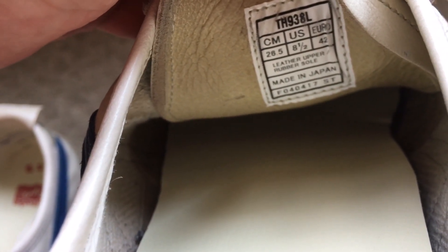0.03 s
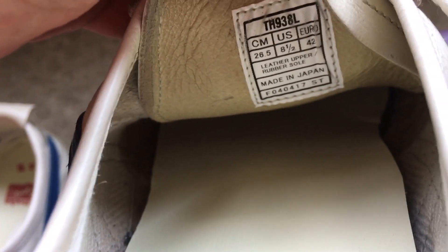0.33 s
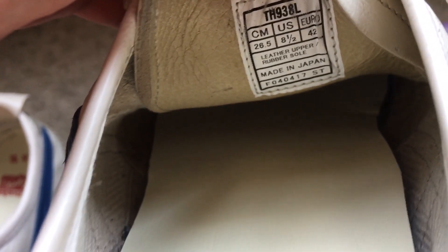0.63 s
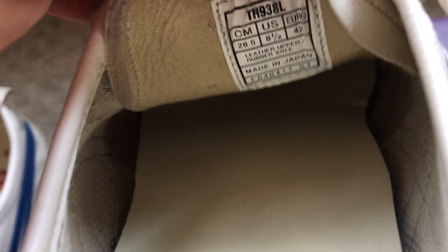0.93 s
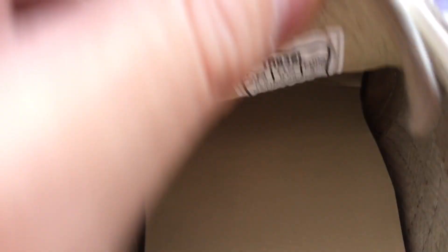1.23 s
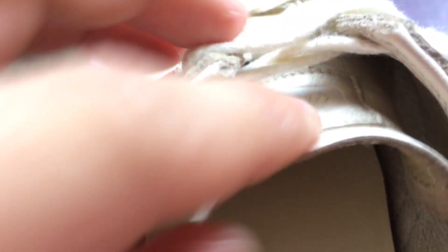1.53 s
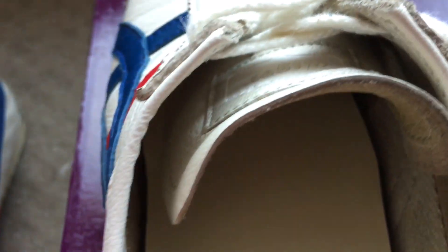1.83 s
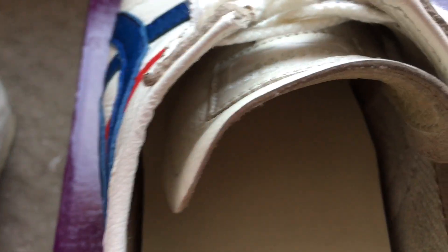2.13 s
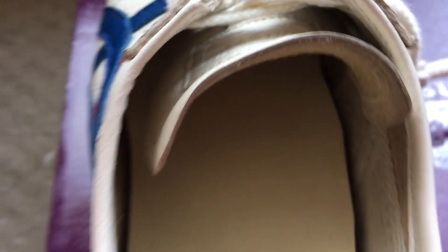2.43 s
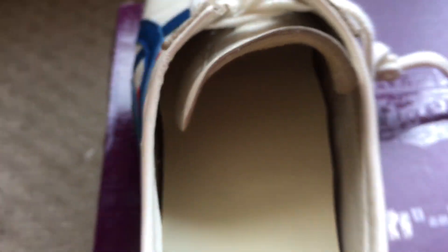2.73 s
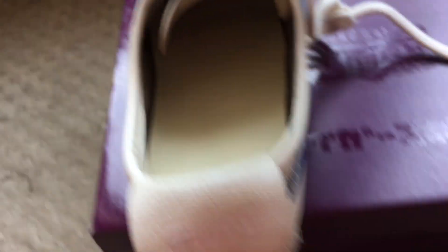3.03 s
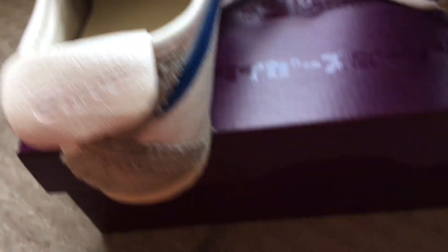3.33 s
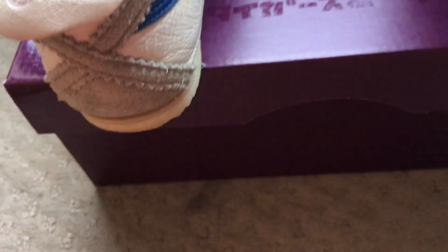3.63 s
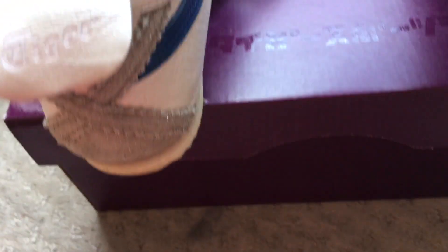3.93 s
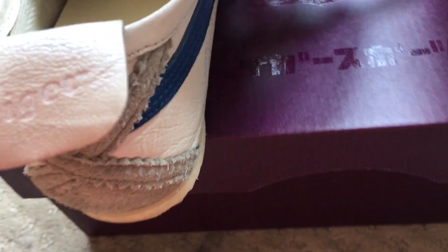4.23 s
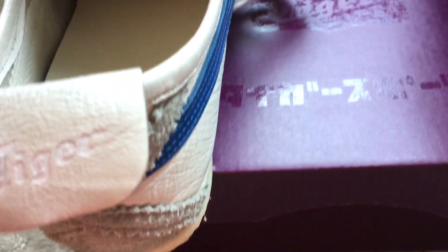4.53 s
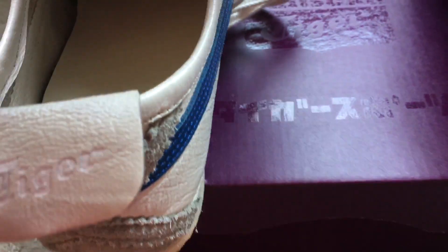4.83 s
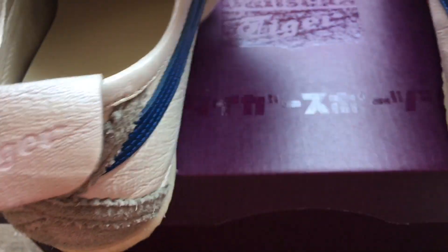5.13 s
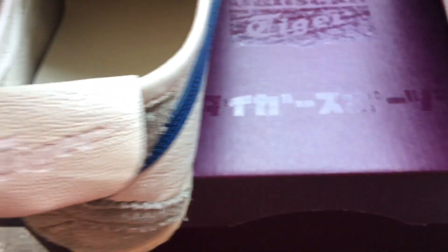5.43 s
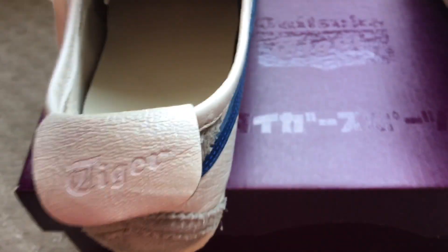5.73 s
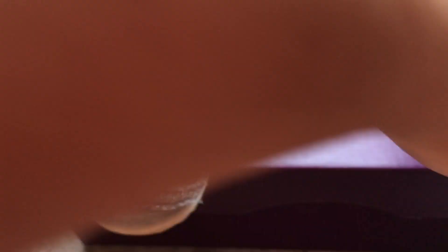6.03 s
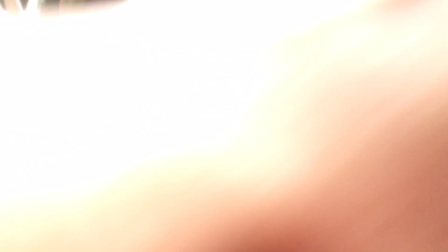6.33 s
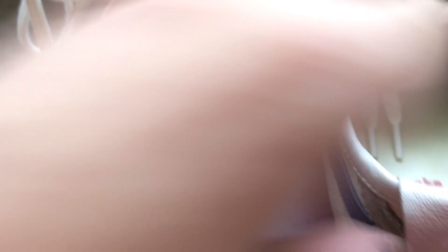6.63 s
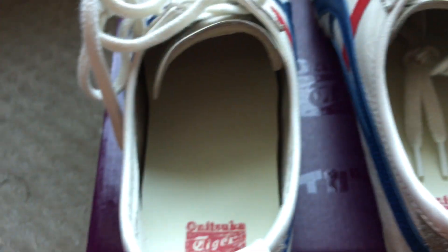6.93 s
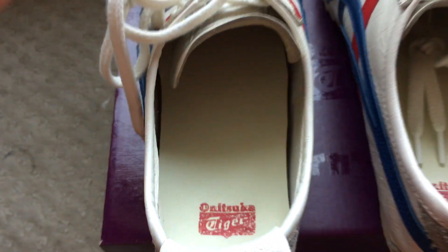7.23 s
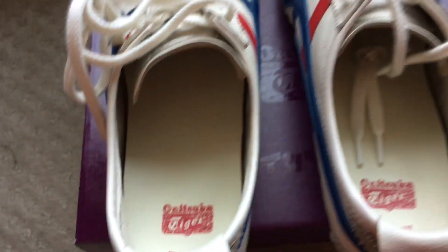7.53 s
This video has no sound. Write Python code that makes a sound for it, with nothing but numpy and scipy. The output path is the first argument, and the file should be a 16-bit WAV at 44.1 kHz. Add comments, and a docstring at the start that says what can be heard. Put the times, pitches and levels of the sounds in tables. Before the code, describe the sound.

Hands handle a leather sneaker on a cardboard shoebox, close to the microphone in a quiet room. Soft bumps and clicks give way to faint rubbing of skin on leather. Midway the sole knocks hollowly on the box and hard lace tips snap against the lid. A brief rasp and another knock follow, then more scuffing and a last clear bump, all over a faint low hum.

```python
"""Sneaker on a shoebox

Hands turn a leather sneaker over on a cardboard shoebox, close-miked in a quiet carpeted room.
The sole bumps the hollow box and catches on the lid, hard lace tips tap the card, skin and leather
rub and scuff, and the shifting grip rumbles softly over a low room hum."""
import sys
import numpy as np
from scipy import signal
from scipy.fft import rfft, irfft, next_fast_len
from scipy.io import wavfile

SR = 44100
rng = np.random.default_rng(int(sys.argv[2]) if len(sys.argv) > 2 else 0)


def file_out(sig):
    """Save sig as 16-bit WAV at sys.argv[1]."""
    # one column per channel
    cols = np.atleast_2d(sig).T
    # limit, then scale
    lim = np.clip(cols, -1, 1)
    pcm = np.round(lim * 32767).astype(np.int16)
    wavfile.write(sys.argv[1], SR, pcm)


N = 339173


def from_db(db):
    return 10 ** (np.asarray(db) / 20)


def rms_one(x):
    return x / np.sqrt(np.mean(x ** 2) + 1e-20)


def peak_one(x):
    return x / (np.abs(x).max() + 1e-20)


def add(track, s, sound):
    """Lay a short sound into the track at s seconds."""
    at = max(0, round(s * SR))
    track[at:at + len(sound)] += sound[:max(0, N - at)]


def colour(x, spectrum):
    """EQ a steady sound to a curve, rolling off steeply past its ends; rms 1."""
    size = next_fast_len(N)
    hz = np.maximum(np.arange(size // 2 + 1) * SR / size, 1)
    points, db = np.transpose(spectrum)
    curve = from_db(np.interp(np.log(hz), np.log(points), db))
    rolloff = 1 / np.sqrt((1 + (points[0] / hz) ** 8) * (1 + (hz / points[-1]) ** 8))
    return rms_one(irfft(rfft(x, size) * rolloff * curve, size)[:N])


def drift(rate):
    """Random modulation, gliding to a new value `rate` times a second."""
    knots = rng.standard_normal(N // 20)
    return np.interp(np.arange(N) / SR * rate, np.arange(len(knots)), knots)


def ring(x, hz, t60):
    """One resonant mode: a unit click rings a decaying sine of height 1."""
    r, w = from_db(-60 / (t60 * SR)), 2 * np.pi * hz / SR
    return signal.lfilter([0, np.sin(w)], [1, -2 * r * np.cos(w), r * r], x + 1e-18)


def band(x, hz, octaves):
    """A gentle band-pass reaching so many octaves to each side."""
    edges = [hz / 2 ** octaves, min(hz * 2 ** octaves, .45 * SR)]
    return signal.sosfilt(signal.butter(1, edges, "band", fs=SR, output="sos"), x + 1e-18)


def push(t, hz, swell):
    """A soft contact swells for `swell` cycles (at least 0.4) and dies away; peak 1."""
    age = t * hz / max(swell, .4)
    return peak_one(np.sin(2 * np.pi * hz * t) * age * np.exp(-age))


def among_fingers(x, strength=0.24, count=7):
    """Comb colour from unevenly spaced reflections off the hand and the shoe."""
    lags = (rng.uniform(.0002, .003, count) * SR).astype(int)
    signs = rng.choice([-1, 1], count)
    return x + sum(sign * strength * np.pad(x, (lag, 0))[:len(x)] for lag, sign in zip(lags, signs))


def crack(t60, snap):
    """A first snap, then a dying burst of tiny fractures."""
    t = np.arange(SR // 10) / SR
    return np.r_[snap, rng.standard_normal(len(t) - 1)] * from_db(-60 * t / t60)


def tick(hz, octaves, t60):
    """Leather damps a tick at once, leaving only a broad colour; peak 1."""
    burst = among_fingers(crack(t60, snap=1))
    return peak_one(band(band(burst, hz, octaves), hz, 2 * octaves))


def stroke(times, attack_s=0.022, release_s=0.093, light_db=-8):
    """Hand pressure: takes hold at the earliest of three times, peaks at 1, lets go at the latest."""
    start, hardest, end = sorted(times)
    knots = [start - attack_s, start, hardest, end, end + release_s]
    light = from_db(light_db)
    return np.interp(np.arange(N) / SR, knots, [0, light, 1, light, 0])


def lid(x, modes, direct_db):
    """Card rings in broad resonances, at least 65 Hz wide, over some of the direct contact."""
    out = from_db(direct_db) * x
    for hz, width, db in modes:
        r = np.exp(-np.pi * max(width, 65) / SR)
        gain = (1 - r * r) / 2
        poles = [1, -2 * r * np.cos(2 * np.pi * hz / SR), r * r]
        out = out + from_db(db) * signal.lfilter([gain, 0, -gain], poles, x + 1e-18)
    return out


# EQ curve of the room tone: f/Hz, level/dB
ROOM_TONE_EQ = [(21, -42), (36, -4), (54, -4), (70, -14), (139, -18.5), (194, -27), (263, -21.5),
                (292, -30.5), (396, -31.5), (730, -39.5), (2300, -44.5), (3380, -47), (16000, -54.5)]
# partials of the low hum: f/Hz, rms level/dB
HUM_PARTIALS = [(45.7, -65), (68, -64.5)]


def room_bed(tone_db=-56.8, waver_db=2.5, waver_radians=0.64):
    """Dark room tone with a low hum that wavers in level and phase."""
    t = np.arange(N) / SR
    hum = np.zeros(N)
    for hz, db in HUM_PARTIALS:
        level = from_db(db + waver_db * drift(2.1))
        hum += level * rms_one(np.sin(2 * np.pi * hz * t + waver_radians * drift(3.3)))
    return from_db(tone_db) * colour(rng.standard_normal(N), ROOM_TONE_EQ) + hum


# modes of the box's air space and panels: f/Hz, level/dB, t60/s
BOX_MODES = [(121.8, -29.5, 0.094), (168.8, 6, 0.096), (216, 0, 0.11), (241, 3.5, 0.027), (346.5, 3, 0.063),
             (400, -29.5, 0.16), (561, 0.5, 0.03), (688, -6, 0.025), (1080, 5.5, 0.066)]
# sole hits on the box: t/s, peak level/dB, contact f/Hz, swell/cycles,
# then the relative layer levels: boom/dB, slap/dB, settle/dB
SOLE_BUMPS = [(0.267, -38, 377, 0.44, -13, -9, -10), (0.669, -43.5, 397, .33, -11, -2.5, -15),
              (1.201, -28.5, 445, 0.58, -2, -11.5, -17), (1.235, -32.5, 444, 0.36, -6, -18, -26),
              (1.407, -19, 432, 0.54, 0, -15.5, -19), (1.588, -40, 434, 0.96, 0, -13.5, -12),
              (1.694, -39, 467, 1.15, 3, -29, -1), (2.176, -49, 210, 0.62, 9, -13, -15),
              (3.533, -21, 296, 0.44, 3, -14, -10.5), (3.809, -17.5, 317, 0.3, -1, -10, -24),
              (4.14, -39.5, 199, 0.39, -5, -28, -9), (4.179, -26.5, 400, .33, 0, -4.5, -10.5),
              (4.242, -35.5, 450, 0.56, 3, -20, -11), (4.268, -30.5, 272, .33, -5, -30, -24),
              (4.302, -29, 463, 0.57, -6, -7, -7), (4.378, -48, 166, 0.67, -7, -30, -29),
              (4.612, -41, 433, .33, 0.5, -33, -6), (5.092, -42, 188, 0.52, 21, -18, -3.5),
              (5.338, -20.5, 623, 0.65, 0.5, -18, -5), (5.386, -38.5, 603, 0.83, 13, -31, 0),
              (5.582, -41.5, 577, 0.64, -10, -31, -38), (5.784, -31.5, 524, 0.49, -12, -13, -11),
              (6.136, -40.5, 209, 0.77, -3, -13, -19), (6.17, -36, 153, 0.38, -7, -33, -23),
              (6.213, -40, 262, 0.35, 15, -22, -22), (6.314, -28, 280, .3, -6.5, -15, -14),
              (6.573, -21, 300, 0.6, -6, -19.5, -22), (7.486, -50, 200, .35, -8, -20, -18),
              (7.62, -45, 191, .34, -21, -24, -22)]


def bumps(flutter_db=-17, flutter_t60=0.072, flutter_hz=330, thud_db=-17, thud_hz=76):
    """The sole slaps, pushes and settles; box booms, lid flutters; a low thud comes with each bump."""
    out, t = np.zeros(N), np.arange(SR // 3) / SR
    for s, db, hz, swell, boom_db, slap_db, settle_db in SOLE_BUMPS:
        contact = push(t, hz, swell)
        spot_db = rng.normal(0, 2.5, len(BOX_MODES))   # each spot on the box favours other modes
        boom = sum(from_db(mode_db + trim_db) * ring(contact, mode_hz, t60)
                   for (mode_hz, mode_db, t60), trim_db in zip(BOX_MODES, spot_db))
        flutter = band(band(rng.standard_normal(len(t)), flutter_hz, 1.47), flutter_hz, 1.47)
        flutter *= from_db(-60 * t / flutter_t60)
        thud = from_db(thud_db) * push(t, thud_hz, swell=1.3)
        body = from_db(boom_db) * peak_one(boom) + from_db(flutter_db) * peak_one(flutter) + thud
        add(out, s, from_db(db) * peak_one(contact + body))
        # the leather slap leads the hit; the shoe settles just after it
        add(out, s - .002, from_db(db + slap_db) * tick(hz=1130, octaves=0.84, t60=0.023))
        add(out, s + .019, from_db(db + settle_db) * push(t, hz=180, swell=0.37))
    return out


# nail ticks and leather crackles: t/s, peak level/dB, centre f/Hz, half-width/octaves, t60/s
LEATHER_TICKS = [(0.289, -42.5, 6000, 2.4, 0.0074), (0.43, -51, 2500, 1.4, 0.1),
                 (1.1508, -34.5, 1380, 0.6, 0.0041), (1.1898, -41, 1990, 0.7, .012),
                 (1.1994, -45.5, 5000, 3, 0.086), (1.393, -41.5, 2320, 0.24, 0.015),
                 (1.4562, -34, 8800, 0.63, 0.0023), (1.567, -49.5, 6000, 1.4, 0.0078),
                 (1.591, -43, 6000, 0.92, 0.014), (1.715, -50, 9000, 1.1, 0.021),
                 (3.529, -38, 1100, 1.7, 0.023), (3.8055, -34, 6100, 1.1, 0.033),
                 (4.138, -45.5, 1500, 2.1, .02), (5.088, -47, 2500, 2.3, 0.06),
                 (5.4282, -43.5, 4000, 1.4, .014), (6.3148, -39.5, 7000, 0.73, 0.036)]


def ticks():
    """Nails tick on the shoe and its leather crackles as it bends."""
    out = np.zeros(N)
    for s, db, hz, octaves, t60 in LEATHER_TICKS:
        add(out, s, from_db(db) * tick(hz, octaves, t60))
    return out


def grains(count, spread_db):
    """Friction texture: countless tiny catches of very uneven size."""
    return rng.standard_normal(count) * from_db(spread_db * np.clip(rng.standard_normal(count), -2, 2))


# short scuffs and swishes of fingers, hand and shoe:
# crest t/s, crest rms level/dB, half-length/s, centre f/Hz, half-width/octaves
HANDLING_SCUFFS = [(0.345, -69.5, 0.031, 3700, 1.9), (0.437, -47.5, 0.0042, 1060, 0.33),
                   (1.079, -60, .09, 480, 0.49), (1.2, -61, 0.027, 12000, 0.36),
                   (1.316, -56.5, 0.036, 510, 0.33), (1.53, -65, 0.1, 12000, 1.7),
                   (1.538, -59, 0.097, 500, .15), (1.708, -55.5, 0.0053, 950, 0.29),
                   (2.241, -56, .02, 1650, 0.43), (2.575, -59, 0.0097, 1160, 1.1),
                   (2.815, -51, .015, 6800, 7.2), (2.876, -68, .027, 3700, 0.24),
                   (3.543, -47.5, 0.0077, 546, 0.15), (3.567, -52, 0.013, 1160, 1.6),
                   (3.942, -62, 0.018, 1460, 0.46), (4.151, -52, 0.0046, 1010, 0.15),
                   (4.19, -46, 0.0091, 2880, 1.9), (4.43, -58, 0.033, 7100, 1.3),
                   (5.111, -54.5, 0.013, 1020, 0.23), (5.181, -59, 0.036, 7750, 0.84),
                   (5.329, -34, 0.0036, 2830, 0.81), (5.88, -54, 0.054, 5300, 0.75),
                   (6.35, -66, 0.15, 2786, 0.24), (6.427, -60, 0.091, 10100, .58),
                   (6.537, -55, 0.042, 3020, 1.2), (6.613, -66, 0.02, 4130, .3),
                   (7.332, -64.5, 0.0051, 4161, 0.41)]


def scuffs():
    """Fingers, hand and shoe scuff and swish in bell-shaped swells of friction grains."""
    out, t = np.zeros(N), np.arange(-SR // 3, SR // 3) / SR
    for s, db, half_length, hz, octaves in HANDLING_SCUFFS:
        grit = among_fingers(grains(len(t), spread_db=2.5))
        friction = rms_one(band(band(grit, hz, octaves), hz, octaves))
        swell = np.exp(-.5 * (t / half_length) ** 2)
        add(out, s + t[0], from_db(db) * friction * swell)
    return out


# EQ curve of the grip's rumble: f/Hz, level/dB
JUDDER_EQ = [(35, -20), (60, -1.5), (119, 0.5), (236, -10), (270, -7), (382, -28), (485, -47), (600, -28),
             (780, -51), (1320, -120)]
# shifts of the grip: three stroke points t/s (in any order), level/dB
GRIP_MOVES = [(0.507, 0.497, 0.75, -45.5), (1.03, 1.352, 1.7, -54.5), (6.11, 6.17, 6.24, -51.5),
              (6.323, 6.46, 6.6, -51.5)]


def grip():
    """The shifting grip judders: uneven bass noise that rides the hand's pressure."""
    uneven = from_db(1.5 * drift(60))
    pressure = sum(from_db(db) * stroke(times) for *times, db in GRIP_MOVES)
    return pressure * colour(rng.standard_normal(N) * uneven, JUDDER_EQ)


# EQ curves of the skin's hiss and the shoe's hollow body: f/Hz, level/dB
HISS_EQ = [(880, -63), (1500, -3), (2020, -0.5), (3000, -3), (4920, -6.5), (6000, -3.5), (6500, -8),
           (8740, -8), (11300, -12), (13300, -10), (16000, -21.5)]
BODY_EQ = [(160, 8), (280, 8.5), (499, 8.5), (538, 13), (841, 2.5), (1340, 4.5), (1690, -37), (2020, -15),
           (2600, -21), (3380, -130), (5720, -120)]
# skin strokes on leather: three stroke points t/s (in any order), hiss level/dB, body level/dB
SKIN_STROKES = [(1.173, 1.18, 1.06, -66, -68), (1.245, 1.32, 1.376, -64.5, -63),
                (1.393, 1.51, 1.59, -64, -63.5), (1.623, 1.665, 1.63, -62, -58.5),
                (1.781, 1.874, 1.836, -71.5, -93), (2.195, 2.22, 2.296, -67, -61.5),
                (2.333, 2.466, 2.567, -63, -63.5), (2.636, 2.84, 2.993, -67.5, -65.5),
                (3.614, 3.7, 3.76, -68, -61), (3.772, 3.803, 3.81, -60, -57.5),
                (4.147, 4.154, 4.176, -58, -55.5), (4.22, 4.26, 4.36, -63.5, -62),
                (4.473, 4.61, 4.62, -74.5, -79), (5.097, 5.1, 5.21, -64.5, -56),
                (5.234, 5.317, 5.32, -51, -53), (5.41, 5.45, 5.61, -77, -67),
                (5.672, 5.879, 5.96, -57.5, -56), (6.099, 6.194, 6.29, -62, -64.5),
                (6.347, 6.397, 6.45, -59, -59.5), (6.501, 6.519, 6.55, -48.5, -47),
                (7.22, 7.297, 7.53, -72.5, -72.5), (7.68, 7.682, 7.76, -63, -56)]


def rubbing(catch_db=3.0, catches_per_s=200, crackles_per_s=110, crackle_size=9):
    """Skin catches and crackles on leather: a fine hiss on top, the hollow of the shoe below."""
    hiss_gain, body_gain = np.zeros(N), np.zeros(N)
    for *times, hiss_db, body_db in SKIN_STROKES:
        pressure = stroke(times)
        hiss_gain += from_db(hiss_db) * pressure
        body_gain += from_db(body_db) * pressure
    crackles = (rng.random(N) < crackles_per_s / SR) * crackle_size * rng.standard_normal(N)
    friction = rng.standard_normal(N) * from_db(catch_db * drift(catches_per_s)) + crackles
    hollow = rng.standard_normal(N) * from_db(catch_db * drift(catches_per_s / 2))
    rub = hiss_gain * colour(friction, HISS_EQ) + body_gain * colour(hollow, BODY_EQ)
    turn = np.pi / 4 * (1 + np.tanh(drift(7)))   # crossfade two colours as the hand turns between poses
    return np.cos(turn) ** 2 * among_fingers(rub) + np.sin(turn) ** 2 * among_fingers(rub)


# resonances of the lid's stiff card: f/Hz, width/Hz, level/dB
LID_MODES = [(914, 61, 6), (1170, 290, -1), (1530, 140, -2), (1930, 250, -0.5), (2040, 240, 0.5),
             (2190, 180, -8), (2730, 64, -8.5), (3210, 124, -2.5), (3600, 52, -13), (4257, 180, 0.5),
             (4360, 86, -20), (5000, 100, -29), (6300, 300, -24), (8370, 390, -11)]
# lace tips on the lid: t/s, peak level/dB, centre f/Hz, crack t60/s
LACE_TAPS = [(1.1526, -32, 1950, 0.0069), (4.2415, -22.5, 4170, 0.018), (4.302, -15.5, 2500, 0.009),
             (4.3195, -26, 3120, 0.0049)]


def lace_taps():
    """A hard lace tip lands with a snap and rings the lid."""
    out = np.zeros(N)
    for s, db, hz, t60 in LACE_TAPS:
        card = lid(crack(t60, snap=2.74), LID_MODES, direct_db=-18)
        add(out, s, from_db(db) * peak_one(band(card, hz, octaves=0.65)))
    return out


# thin, high whistles: crest t/s, peak level/dB, top f/Hz
WHISTLE_ARCHES = [(2.62, -81, 13350), (2.74, -77, 13900), (2.91, -88, 13500), (3.005, -80, 13150)]


def whistles(half_length_s=.02, sag_hz=110):
    """Each faint whistle arches up in pitch and level, then sinks away."""
    out, t = np.zeros(N), np.arange(-SR // 12, SR // 12) / SR
    off_crest = (t / half_length_s) ** 2
    for s, db, top_hz in WHISTLE_ARCHES:
        phase = 2 * np.pi * np.cumsum(top_hz - sag_hz * off_crest) / SR
        add(out, s + t[0], from_db(db) * np.exp(-.5 * off_crest) * np.sin(phase))
    return out


# resonances of the lid under the slipping sole: f/Hz, width/Hz, level/dB
RASP_MODES = [(1830, 56, -5), (2060, 160, -5.5), (2570, 62, 8), (2610, 61, -9), (3200, 60, -1),
              (3600, 65, -15), (4150, 68, -30), (5470, 59, -28)]


def slips(start_s=5.25, gap_s=.0125, jitter_s=0.00063, count=6):
    """Stick-slip: pushed over the lid, the sole catches in a quick run, each harder and shorter."""
    out, t = np.zeros(N), np.arange(-SR // 50, SR // 20) / SR
    times = start_s + gap_s * np.arange(count) + jitter_s * rng.standard_normal(count)
    levels_db = np.linspace(-45, -34, count)
    half_lengths_s = np.linspace(0.0033, 0.0031, count)
    for s, db, half_length in zip(times, levels_db, half_lengths_s):
        press = np.exp(-.5 * (t / half_length) ** 2)
        card = lid(grains(len(t), spread_db=4.0) * press, RASP_MODES, direct_db=-15.5)
        rasp = rms_one(band(card, hz=1730, octaves=0.93))
        add(out, s + t[0], from_db(db) * rasp * np.sqrt(np.mean(press ** 2)))
    return out


def room(x, wet_db, t60, wall_hz):
    """The furnished room adds a short, dull tail after a 5 ms pre-delay."""
    t = np.arange(SR // 2) / SR
    tail = rng.standard_normal(len(t)) * from_db(-60 * t / t60) * (t > .005)
    tail = signal.sosfilt(signal.butter(1, wall_hz, fs=SR, output="sos"), tail)
    return x + from_db(wet_db) * signal.fftconvolve(x, tail / np.sqrt(np.sum(tail ** 2)))[:N]


def scene():
    """Mono mix: close handling with a touch of room, over the bed."""
    handling = bumps() + lace_taps() + ticks() + slips() + scuffs() + rubbing() + grip() + whistles()
    return (room(handling, wet_db=-16.5, t60=0.1, wall_hz=5500) + room_bed())[None]


def record(dry):
    """The microphone drops the sub-bass below 37 Hz; a steep high cut sits at 15.9 kHz."""
    thinned = signal.sosfilt(signal.butter(6, 37, "high", fs=SR, output="sos"), dry)
    return signal.sosfilt(signal.ellip(10, .2, 70, 15900, fs=SR, output="sos"), thinned)


dry = scene()
out = record(dry)
file_out(out)
```